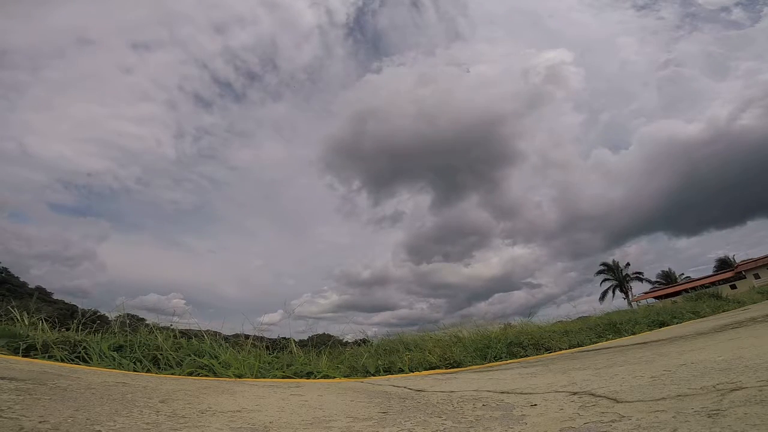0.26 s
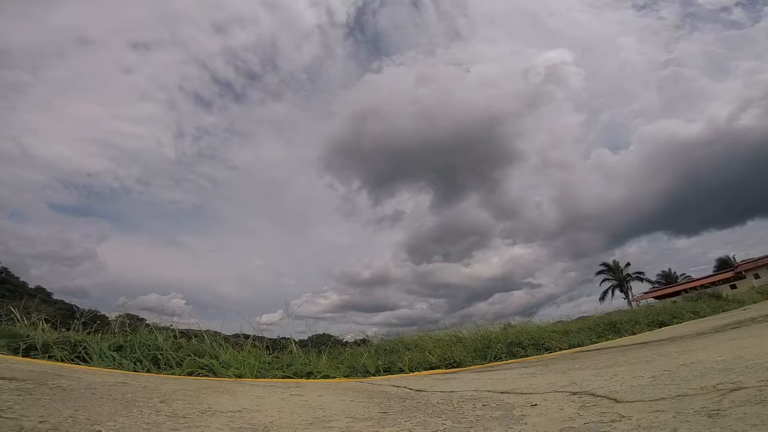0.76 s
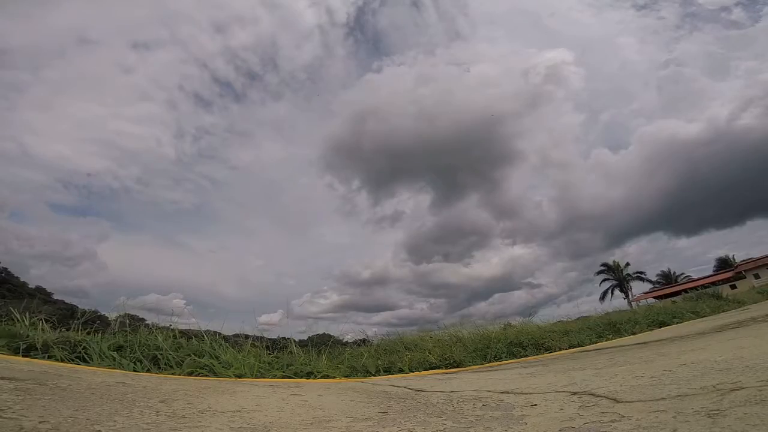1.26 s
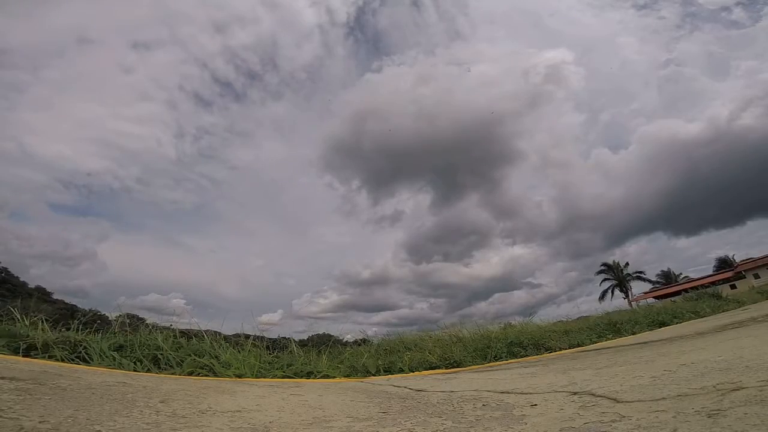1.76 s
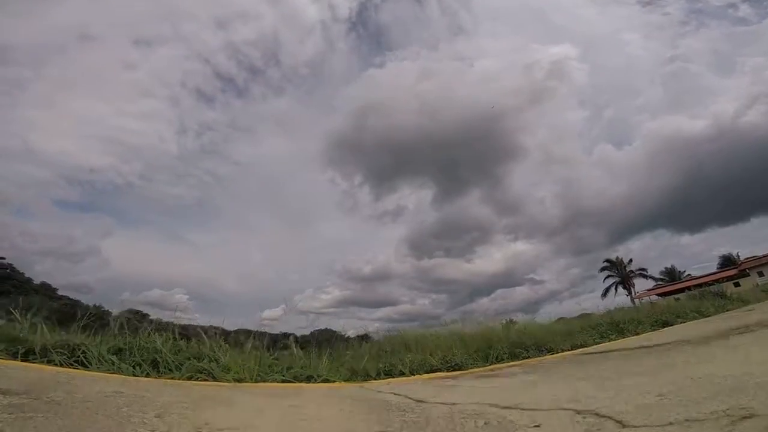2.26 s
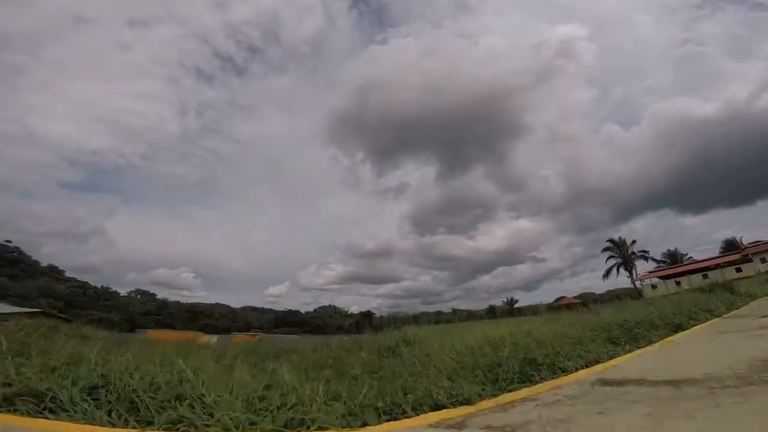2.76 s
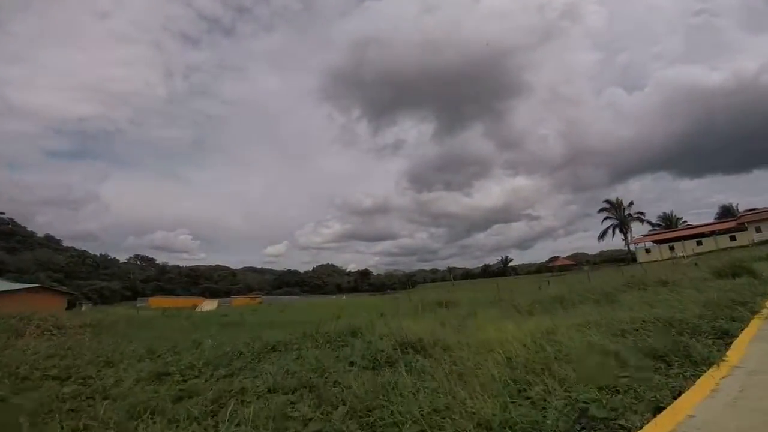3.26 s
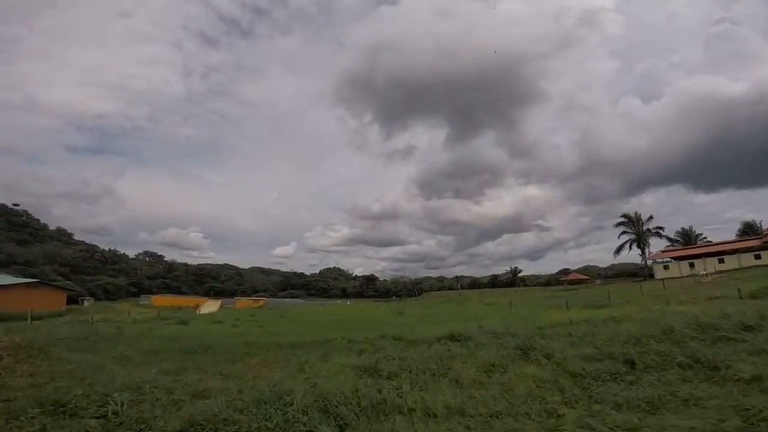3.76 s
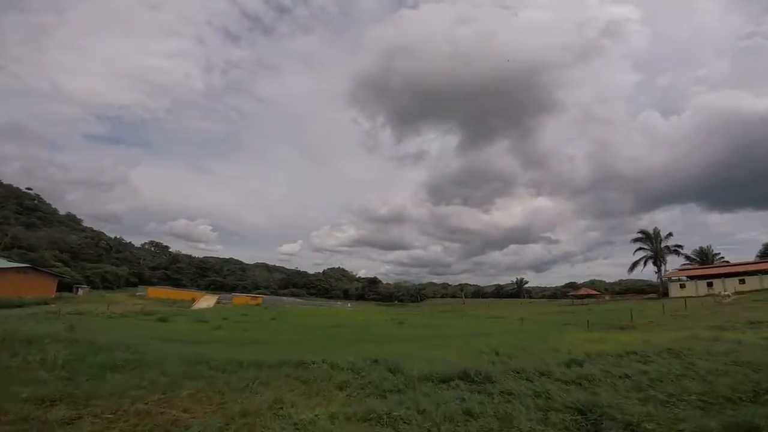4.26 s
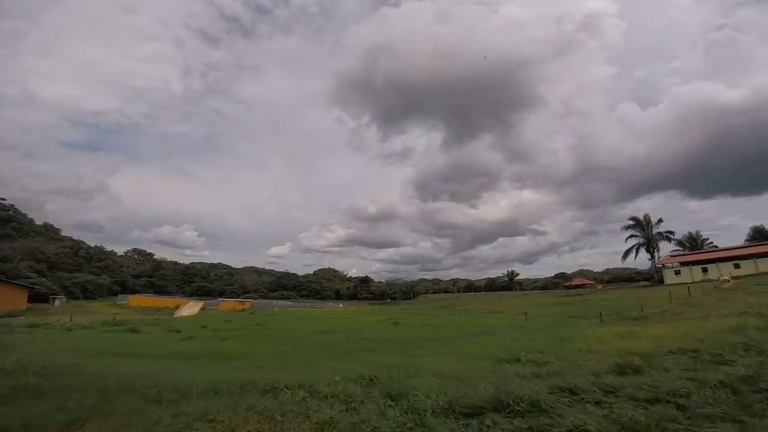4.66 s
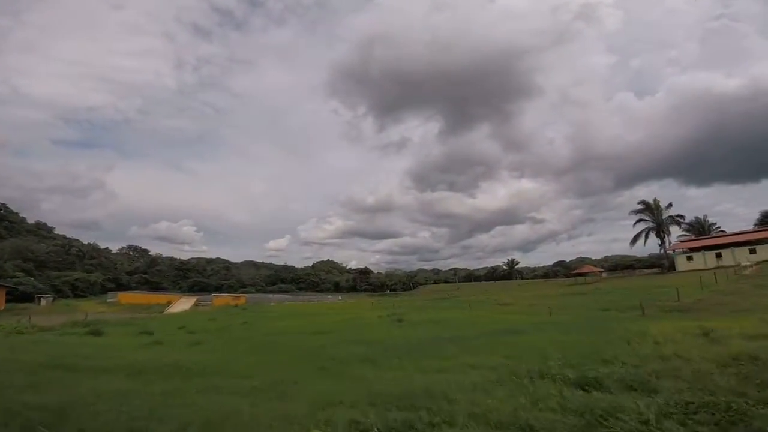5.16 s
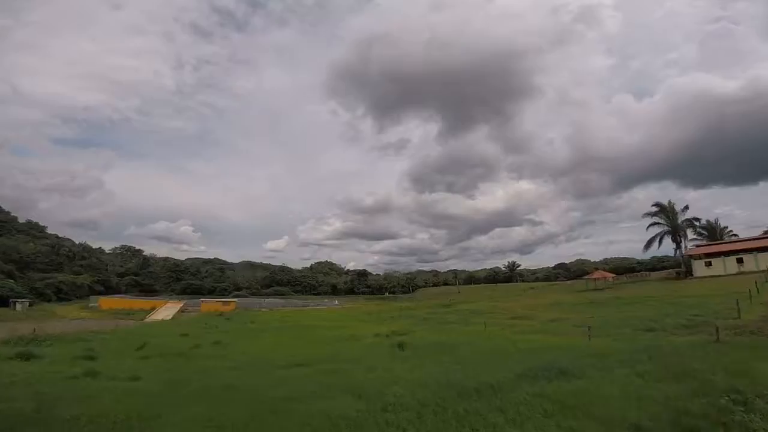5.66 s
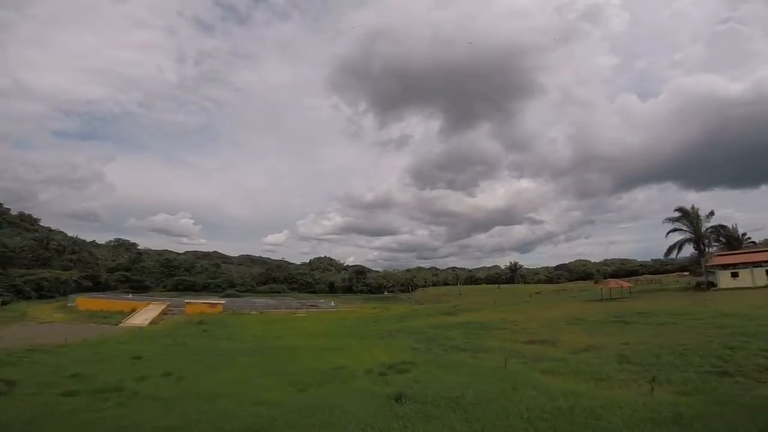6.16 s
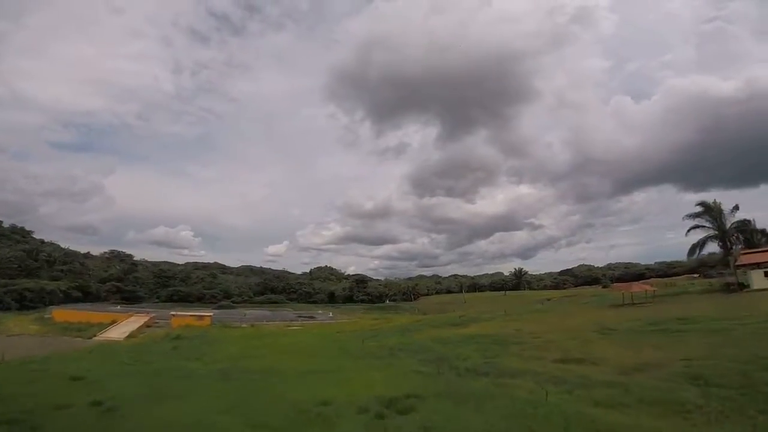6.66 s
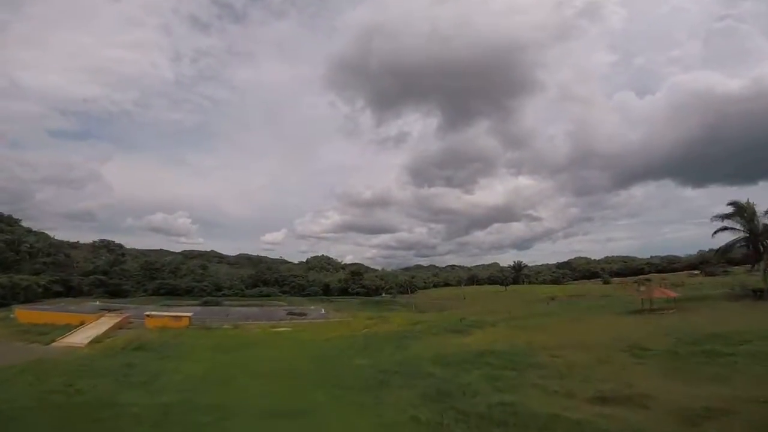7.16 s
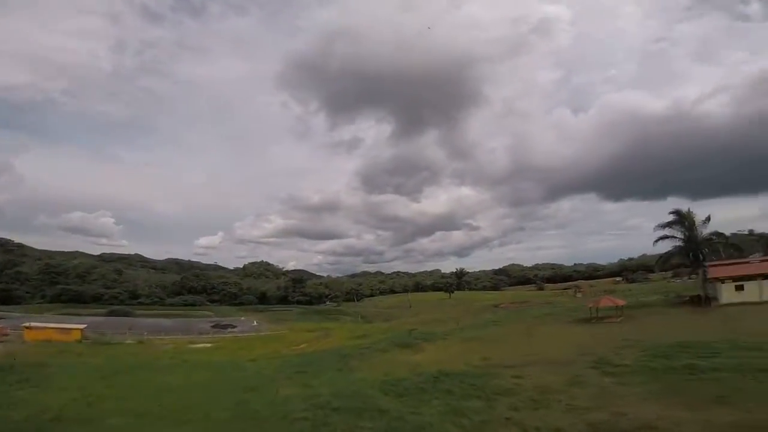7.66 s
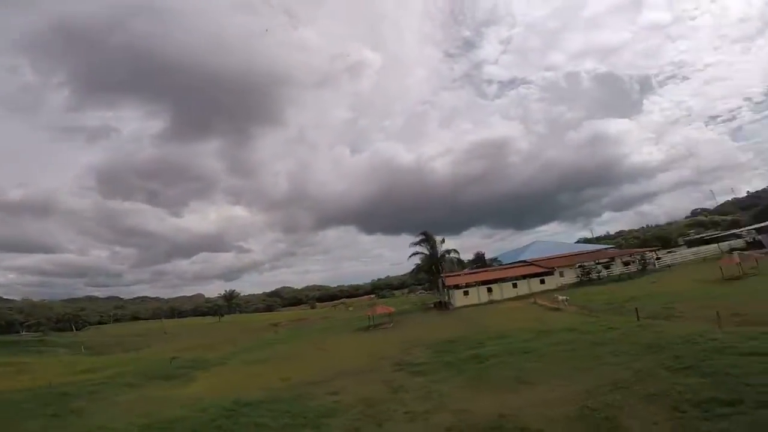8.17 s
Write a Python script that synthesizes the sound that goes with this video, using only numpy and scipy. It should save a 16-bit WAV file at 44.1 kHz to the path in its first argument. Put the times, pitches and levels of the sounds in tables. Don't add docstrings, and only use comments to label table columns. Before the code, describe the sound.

Mounted on a small quadcopter, the microphone hears motors whine and rattle on concrete for a moment, then propellers jump to a loud pulsing hum. The pitch climbs at takeoff into a rough steady buzz over grass. A cut and recovery follow, then screaming punches with limp drops between them, a near-idle flutter, and a last surge. Low wind roar and airy hiss surround everything, close and dry outdoors.

```python
import sys
import numpy as np
from scipy import signal
from scipy.fft import rfft, irfft
from scipy.io import wavfile
from scipy.ndimage import uniform_filter1d

SR = 44100
rng = np.random.default_rng(int(sys.argv[2]) if len(sys.argv) > 2 else 0)


def gain_from_db(level_db):
    decades = np.asarray(level_db, float) / 20
    return 10 ** decades


def dump_mix(stems):
    frames = np.atleast_2d(stems).T
    limited = np.clip(frames, -1, 1)
    pcm = np.round(limited * 32767).astype(np.int16)
    wavfile.write(sys.argv[1], SR, pcm)


N = 371322
TIME = np.arange(N) / SR
BLADES = 3

# (time [s], overtones [dB], frame [dB])
FLIGHT = [(0, 6, 9), (.55, -6.5, 3.5), (1.08, 2, -5), (1.2, 10.5, -3.5), (1.6, 0, 0), (1.95, 2.5, -4.5),
          (2.15, -10, -5.5), (2.4, -7.5, 0), (2.9, -0.5, -1), (3.2, -0.5, -4.5), (3.5, 2, -2),
          (3.85, -1.5, 12.5), (4.5, -7.5, 6), (4.78, -7, 3), (4.9, -1.5, 7.5), (5.45, -6, 6),
          (5.75, -0.5, 6.5), (6.45, -0.5, 1), (6.7, -2, -2), (7.0, -7.5, 6.5), (7.9, 6, 2), (8.1, 1.5, 2.5),
          (8.42, 2.5, 6)]


def curve(table):
    s, *columns = np.transpose(table)
    return [np.interp(TIME, s, c) for c in columns]


def by_speed(table, hz):
    at, *columns = np.transpose(table)
    return [np.interp(np.log(hz), np.log(at), c) for c in columns]


def span(table, fade=0.0068):
    start, end = table[0][0], table[-1][0]
    return np.clip(np.minimum(TIME - start, end - TIME) / fade + (start == 0), 0, 1)


def dips(table):
    return sum(depth_db * np.exp(-((TIME - s) / width) ** 2) for s, depth_db, width in table)


def walk(rate):
    k = int(SR / rate)
    held = np.repeat(rng.standard_normal(N // k + 1), k)
    return 1.3 * uniform_filter1d(uniform_filter1d(held, k), k)[:N]


def noise(shape, lo_hz, hi_hz):
    hz = np.arange(N // 2 + 1) * SR / N + 1
    at, db = np.transpose(shape)
    gain = gain_from_db(np.interp(np.log(hz), np.log(at), db, -90, -90))
    bins = rfft(rng.standard_normal(N)) * gain
    inside = np.sum(np.abs(bins[(hz > lo_hz) & (hz < hi_hz)]) ** 2) * 2 / N ** 2
    return irfft(bins, N) / np.sqrt(inside)


def tone(phase, db, flutter_db):
    return np.sqrt(2) * gain_from_db(db + flutter_db * walk(30)) * np.sin(phase)


def hunt(lead):
    # (start [s], end [s], a moment the cycles peak at, counted on or back [s], rate [Hz], speed swing [0-1])
    bursts = [
        (5.089, 5.24, 5.105, 24.66, 0.08),
        (5.592, 5.792, 6.06, 26.18, 0.04),
        (6.511, 7.021, 6.2, 23.04, 0.13),
    ]
    out = 0
    for start, end, top, rate, swing in bursts:
        progress = np.clip((TIME - start) / (end - start), 0, 1)
        swell = np.sin(np.pi * progress ** 1.53) ** 0.49
        swell = swell * (1 + 0.2 * np.sin(2 * np.pi * 7.3 * TIME))
        out = out + swing * swell * np.cos(2 * np.pi * (rate * (TIME - top) + lead))
    return out


def turn(hz, lead, jitter, share):
    return 2 * np.pi * np.cumsum(hz * (1 + share * hunt(lead) + jitter * walk(40))) / SR


def stir(hz):
    return uniform_filter1d(np.gradient(np.log(hz)) * SR, SR // 40)


def stick():
    # (start [s], length [s], blade rate [Hz], blade tone [dB], effort [dB])
    moves = [(0.313, 0.039, 239.6, -14.5, -41), (0.396, 0.11, 346.4, -9, -43),
             (0.501, 0.14, 321.9, -9, -39.5), (1.087, 0.085, 360.7, -8, -42),
             (1.547, 0.086, 382.5, -10, -41), (1.806, 0.16, 446.8, -15, -34), (2.05, 0.13, 550, -25, -31),
             (2.27, 0.061, 530, -25.5, -34), (2.36, 0.19, 625, -24, -34), (2.55, .19, 642.5, -19.5, -32.5),
             (2.741, 0.027, 619.7, -19.5, -33.5), (2.845, 0.074, 644, -20.5, -32.5),
             (2.95, 0.31, 639.4, -23, -32), (3.282, 0.055, 628.4, -19.5, -33),
             (3.599, .04, 618, -18.5, -34), (3.778, 0.062, 593.6, -17.5, -36.5),
             (3.86, 0.12, 289.3, -23, -44.5), (4.01, 0.05, 344.8, -18, -39.5),
             (4.08, 0.051, 374.4, -14.5, -40.5), (4.136, 0.087, 536, -19, -35),
             (4.421, 0.08, 443, -14, -39), (4.805, 0.29, 800, -25, -36), (5.135, 0.095, 479.9, -19.5, -41),
             (5.37, .27, 938.3, -19, -33.5), (5.73, 0.081, 419.8, -35, -46.5),
             (5.832, .05, 303.3, -45, -55.5), (6.006, .33, 190, -30, -53), (6.37, 0.05, 310, -10, -44),
             (6.425, 0.085, 720.5, -20, -35.5), (6.55, 0.17, 878.7, -20.5, -37),
             (6.941, 0.092, 433, -32, -46.5), (7.035, 0.062, 270.4, -44, -54.5),
             (7.401, 0.21, 97.2, -31, -49), (7.62, 0.058, 98.1, -20, -47.5),
             (7.79, 0.093, 159.9, -16.5, -44), (7.89, 0.047, 205.1, -10.5, -40.5),
             (7.968, 0.17, 502.5, -17.5, -35), (8.2, .1, 514.5, -18, -35),
             (8.325, 0.06, 596.6, -18.5, -33.5)]
    # (blade rate [Hz], blade tone [dB], effort [dB])
    rest = (250, -17, -48.5)
    motor_lag_s, stall_db, stall_slope, spin_up_db = 0.031, -47, 2.53, 0.39
    rise_half, fall_half = 0.57, 0.36
    rows, last = [(0, *rest)], np.array(rest)
    for start, length, *state in moves:
        share = rise_half if state[0] > last[0] else fall_half
        half = last + share * (state - last)
        rows += [(max(start, rows[-1][0]), *last), (start + length / 2, *half), (start + length, *state)]
        last = np.array(state)
    lag = int(motor_lag_s * SR)
    hz, blade_db, effort_db = (uniform_filter1d(c, lag, mode="nearest") for c in curve(rows))
    effort_db = effort_db + spin_up_db * np.clip(stir(hz), 0, 6)
    return hz, blade_db, effort_db + stall_slope * np.minimum(effort_db - stall_db, 0)


def microphone_noise():
    # (frequency [Hz], density [dB per Hz])
    self_noise = [(450, 4.5), (700, 16.5), (1300, 0.5), (3000, -18), (6200, -20.5), (7400, -24),
                  (10500, -14.5), (14500, -30)]
    # (frequency [Hz], width [Hz], level [dB])
    modes = [(1950, 200, -64), (4580, 400, -70), (5550, 400, -70), (6640, 200, -71), (8200, 250, -72),
             (9160, 500, -71)]
    out = noise(self_noise, 1500, 15000) * gain_from_db(-68.0 + 1.5 * walk(16))
    for hz, width, db in modes:
        mode = [(hz - 2 * width, -24), (hz, 0), (hz + 2 * width, -24)]
        out += gain_from_db(db + 3.5 * walk(14)) * noise(mode, 20, SR / 2)
    return out


def ticks():
    # (time [s], level [dB], frequency [Hz])
    taps = [
        (0.347, -38, 5200),
        (6.224, -65, 8240),
        (7.473, -53, 6820),
        (7.68, -49, 4940),
    ]
    decay_s = 0.006
    out = np.zeros(N)
    for s, db, hz in taps:
        age = np.maximum(TIME - s, 0)
        band = signal.butter(2, [0.74 * hz, 1.17 * hz], "bp", fs=SR, output="sos")
        ring = signal.sosfilt(band, rng.standard_normal(N))
        out += gain_from_db(db + 20.0) * (TIME > s) * np.exp(-age / decay_s) * ring
    return out


def idle_whine():
    # (multiple of idle turns, level [dB])
    magnets = [(3.7, -23.5), (6.5, -26.5), (7, -23), (7.2, -32), (8, -28.5), (8.6, -30.5), (9.5, -35.5),
               (21, -42.5), (22.5, -49.5), (24.0, -37.5), (25.3, -43)]
    # (frequency [Hz], density [dB per Hz])
    rattle = [(3000, -12), (4700, -8), (5400, 1), (6500, -9), (8000, -25), (9000, -9), (9500, -18),
              (10000, -10), (11000, -28)]
    # (time [s], whine level [dB])
    idle = [(0, -2.5), (.3, -1), (.36, -39), (5.8, -35), (5.92, -26), (6.33, -25), (6.4, -35), (7.1, -25),
            (7.3, -21), (7.5, -26), (8.42, -34)]
    aloft = TIME > 1
    phase = turn(83.9, 0., jitter=.004 + .012 * aloft, share=0)
    out = sum(tone(k * phase + (.6 + .04 * k * aloft) * walk(50), db, 2.) for k, db in magnets)
    out += (TIME < 1) * noise(rattle, 1500, 15000) * gain_from_db(-52 + 2.5 * walk(30))
    return out * gain_from_db(curve(idle)[0])


def ground_scour():
    # (frequency [Hz], density [dB per Hz])
    scour = [(700, -23), (1200, 4), (2000, 1.5), (2900, 1), (3600, -21), (4500, -29)]
    # (time [s], scour level [dB])
    ground = [(.35, -41), (.6, -33), (1.12, -28), (1.3, -39.5), (1.75, -34.5), (2.15, -26), (2.3, -29.5),
              (2.45, -52)]
    level_db = curve(ground)[0] + 1.8 * walk(18) + 1.3 * walk(90)
    return span(ground) * noise(scour, 800, 4000) * gain_from_db(level_db)


def air(blade):
    # (time [s], gust [dB])
    gusts = [(0, -22), (.3, -18.5), (.35, -16.5), (1.15, -15), (1.3, -19), (1.8, -18.5), (2.16, -14),
             (2.37, -21), (2.5, -25.5), (3.3, -26), (3.96, -27.5), (4.25, -24), (4.9, -28), (5.4, -22.5),
             (6.47, -20.5), (6.6, -18.5), (7.5, -25.5), (8.14, -15)]
    # (blade rate [Hz], roar over gust [dB])
    roar_by_speed = [(250, 5.5), (340, 2.5), (450, 3.5), (620, 3), (900, -0.5)]
    # (start [s], end [s], top [dB], wash [dB])
    puffs = [
        (0.317, 0.511, 17.5, 3.5),
        (0.478, 0.746, 5, -0.5),
        (1.9, 2.34, 4.5, -2.5),
        (3.25, 3.45, -3, 3.5),
        (4.843, 5.038, 15, 5),
        (6.404, 6.536, 14, 6.5),
        (6.69, 6.988, 14, -1),
        (7.865, 8.21, -2, 3),
        (8.198, 8.5, 4, -4),
    ]
    # (frequency [Hz], density [dB per Hz])
    wind_shape = [(12, -6.5), (25, -4.5), (50, 0.5), (90, 1.5), (160, -1.5), (260, -16), (420, -18),
                  (520, -43)]
    roar_shape = [(330, -13), (440, -4), (660, -9.5), (760, -13.5), (1000, -16.5), (1400, -20), (2000, -37),
                  (3500, -71)]
    drum_shape = [(130, -22), (220, 0.5), (300, -4), (400, -7.5), (470, -26.5)]
    wash_shape = [(300, -31), (700, 3), (1300, 1.5), (2200, 0.5), (3300, -3), (4500, -10), (6000, -25.5),
                  (9000, -34)]
    hiss_shape = [(2500, -31), (4200, -1.5), (4800, -2.5), (5900, -0.5), (7100, 4), (7800, 0), (8400, -6),
                  (8800, -4.5), (9500, -14), (10300, -21), (11000, -14), (12000, -28), (13000, -23),
                  (14800, -51.5)]
    top_shape = [(8500, -7), (10000, -1.5), (12000, -8), (13300, -10.5), (14000, -33)]
    (hz, _, hiss_db), gust_db = stick(), curve(gusts)[0]
    wind_db = gust_db + 0.25 * np.minimum(hiss_db + 43.5, 0)
    roar_db = wind_db + curve(FLIGHT)[1] + by_speed(roar_by_speed, hz)[0]
    roar_db = roar_db + 0.21 * np.minimum(hiss_db + 38, 0)

    wake_s, wake_offset_db = 0.05, -11
    keep = np.exp(-1 / (wake_s * SR))
    wake_db = 20 * np.log10(signal.lfilter([1 - keep], [1, -keep], gain_from_db(hiss_db))) + wake_offset_db
    wash_db = 11.5 + 0.72 * np.maximum(hiss_db, wake_db) + 0.82 * gust_db - 0.3 * np.log2(hz / 500)

    push_db, flicker_db = 25 * hunt(0.022), 1.1 * walk(25)
    puff_db, gush_db = sum(np.outer(db, span([(start,), (end,)], fade=0.021)) for start, end, *db in puffs)
    wash_db, hiss_db = wash_db + gush_db, hiss_db + 0.23 * puff_db

    wind = noise(wind_shape, 5, 129) * gain_from_db(wind_db + 0.39 * walk(7.8))
    roar = noise(roar_shape, 220, 1700) * gain_from_db(roar_db - 13.5 + flicker_db)
    drum_db = roar_db - 3.0 - 1.12 * np.clip(hiss_db + 52, 0, 14) + 3.3 * walk(20)
    roar += noise(drum_shape, 215, 450) * gain_from_db(drum_db)
    wash = noise(wash_shape, 1820, 6400) * gain_from_db(wash_db - 4.5 + push_db + flicker_db + 1.34 * walk(120))
    wash = wash * (1 + 0.28 * np.cos(blade))
    hiss = noise(hiss_shape, 5100, 11000) * gain_from_db(hiss_db - 3.5 + push_db + flicker_db + 0.69 * walk(120))
    hiss = hiss * (1 + 0.17 * np.cos(blade))
    top_db = hiss_db + 0.5 * gust_db - 22.5 + puff_db + push_db + 1.5 * walk(120)
    top = noise(top_shape, 9000, 15000) * gain_from_db(top_db)
    return wind + roar + wash + hiss + top


def shafts():
    # (time [s], speed ratio to the nearest shaft, shake [dB])
    worst = [(0, 1.46, -6), (.3, 1.55, -7.5), (.35, 1.5, -24), (.5, 0.86, -36.5), (1.6, 0.96, -16),
             (2.07, 0.93, -21.5), (2.13, .96, -9.5), (2.3, .95, -10.5), (2.5, 0.84, -11.5),
             (3.2, 0.86, -11), (3.7, 0.94, -10.5), (3.87, 0.84, -12.5), (4.0, 1.47, -13.5),
             (4.2, 1.01, -11.5), (4.8, 1.2, -12.5), (5.1, 1.07, -5.5), (5.38, 1.06, -12.5),
             (5.74, 1.043, -11), (6.54, 1.105, -9), (6.8, 0.92, -12), (6.97, 1.05, -10.5),
             (7.9, 1.036, -19.5), (8.15, 1.1, -15), (8.42, 1.05, -15)]
    # (time [s], depth [dB], half width [s])
    chops = [(5.8, 6, .012), (3.4, 11, 0.009), (5.78, 22, 0.035), (0.15, 11, 0.033), (6.39, 26, 0.026),
             (6.1, 16, 0.017), (4.015, 14, 0.037), (5.26, 14, 0.073), (7.04, 27, 0.037), (6.48, 8, .015),
             (4.88, 12, .01), (4.98, 10.5, 0.0081)]
    # (time [s], level over the shake [dB])
    twice = [(0, -19.5), (2.3, -25.5), (2.7, -29), (3.7, -23.5), (4.1, -37), (4.6, -31), (4.95, -14.5),
             (5.08, -28), (5.45, -18.5), (5.7, -21), (6.5, -26.5), (8.0, -27), (8.2, -30), (8.42, -32)]
    # (time [s], frequency [Hz], level [dB])
    wobble = [(2.45, 387, -36), (2.75, 387, -32), (3.05, 385, -28.5), (3.3, 369, -28.5),
              (3.6, 382.4, -32.5), (3.8, 400, -39)]
    # (time [s], turns [Hz], shake [dB])
    beats = [
        [(2.3, 167.1, -10), (2.54, 193.2, -19.5), (2.85, 194.3, -14.5)],
        [(3.6, 181.6, -20), (3.85, 200.6, -11.5), (3.93, 184.2, -13), (3.985, 160, -13)],
        [(4.15, 191, -12), (4.238, 213.5, -14.5), (4.45, 206, -13)],
        [(5.29, 172.4, -12.5), (5.38, 173, -12.5), (5.652, 306.5, -15.5), (5.72, 311.4, -14.5)],
        [(8.15, 171.9, -16.5), (8.234, 180.4, -12), (8.42, 186.3, -14)],
    ]
    # (time [s], turns [Hz], shake [dB])
    near_shaft = [
        [(2.45, 194.7, -12), (2.75, 209.9, -15), (3.85, 210.5, -15)],
        [(4.46, 151.9, -20), (4.8, 152, -18.5), (4.9, 188, -8)],
        [(5.735, 290, -3.5), (5.79, 253, -13)],
        [(6.55, 285, -9.5), (6.686, 307.5, -11), (7.0, 282.4, -11.5)],
    ]
    (near_hz, _, effort_db), (ratio, db) = stick(), curve(worst)
    hz = np.maximum(ratio * near_hz / BLADES, 104.9)
    db = db + 0.66 * np.minimum(effort_db + 40.5, 0)
    db = db - dips(chops)
    twice_db = db + curve(twice)[0]
    phase = turn(hz, 0.28, jitter=0.0055, share=0.58)
    out = tone(phase + 0.52 * np.maximum(-stir(hz), 0) * walk(60), db, 3.4)
    out += tone(2 * phase + 0.88 * walk(60), twice_db, 4.2)
    out += tone(4 * phase + 1.1 * walk(60), twice_db - 15.5, 4.6)

    hz, db = curve(wobble)
    out += span(wobble) * tone(turn(hz, 0., jitter=.01, share=0) + 0.77 * walk(60), db, 2.8)

    for table in beats + near_shaft:
        hz, db = curve(table)
        phase = turn(hz, 0.085, jitter=0.0054, share=1.0)
        shake = tone(phase, db, 1.0)
        if table in beats:
            shake += tone(42 * phase, db - 48 - np.maximum(42 * hz - 9300, 0) * .008, 4.)
        out += span(table) * shake
    return out


def other_props():
    # (time [s], speed ratio, blade tone [dB])
    trim = [(0, 0.96, -21), (.25, 1.32, -20.5), (.45, 0.85, -7), (.6, 0.87, -22.5), (.7, 0.93, -39),
            (1.62, 1.1, -28), (1.72, 0.96, -17.5), (1.92, .92, -20.5), (2.05, 0.87, -21.5),
            (2.45, 0.9, -33), (3.18, .88, -30.5), (3.28, .9, -23.5), (3.6, 0.89, -22.5), (3.84, 0.82, -19),
            (3.91, .92, -16.5), (4.0, 1.12, -24), (4.08, 1.15, -16.5), (4.25, 1.03, -19), (4.6, 1.14, -22),
            (4.95, 1.05, -24), (5.1, .92, -28), (5.35, 1.015, -20), (5.5, 1.09, -28), (5.7, 1.06, -26),
            (5.85, 1.02, -28.5), (6.45, 1.085, -16), (6.55, 0.88, -28.5), (6.8, 0.91, -22.5),
            (7.05, 0.87, -32)]
    # (time [s], blade rate [Hz], blade tone [dB])
    others = [
        [(7.25, 250, -36), (7.35, 246.5, -31), (7.5, 253.2, -37)],
        [(7.55, 205, -23), (7.585, 250, -13), (7.7, 302, -25.5)],
        [(7.7, 235.4, -25), (7.8, 219.4, -11), (7.87, 228, -13.5)],
        [(7.71, 172, -19), (7.79, 188, -16)],
        [(7.93, 354.3, -19.5), (8.05, 354, -11.5), (8.14, 391, -16)],
        [(8.29, 515.7, -17.5), (8.37, 494, -21)],
        [(8.1, 540, -31), (8.17, 672, -28.5), (8.3, 705, -25), (8.42, 795, -25)],
    ]
    # (time [s], level [dB])
    bite = [(0, -3), (3.15, 1), (3.3, 10), (3.6, 3.5), (3.75, 3), (4.9, 3), (5.5, 4.5), (6.5, 2.5),
            (8.05, 2), (8.17, 8), (8.3, 3), (8.42, 1)]
    (near_hz, _, effort_db), (ratio, trim_db) = stick(), curve(trim)
    opposite = ratio * near_hz, trim_db + 1.0 * np.minimum(effort_db + 55.0, 0)
    bite_db = curve(bite)[0] + 0.82 * curve(FLIGHT)[0] - 18.5
    out = 0
    for table in [trim] + others:
        hz, db = opposite if table is trim else curve(table)
        phase = turn(hz, 0.2, jitter=0.005, share=0.72)
        change = np.abs(stir(hz))
        blades = tone(phase + (0.5 + 0.24 * change) * walk(90), db, 1.0)
        for k in range(2, 8):
            partial_db = db + bite_db - 8 * np.log2(k / 2) + 9 * np.log2(hz / 550)
            blades += tone(k * (phase + (.15 + 0.038 * change) * walk(90)), partial_db, 2.2)
        out = out + span(table) * blades
    return out


def cogging(phase):
    # (multiple of shaft turns, level [dB])
    orders = [(5, 0), (6, -3), (7, 0)]
    # (time [s], level [dB])
    level = [(.42, -32), (.52, -33), (.62, -36), (.9, -40.5), (1.1, -38)]
    level_db = curve(level)[0]
    return span(level) * sum(tone(k * phase / BLADES + .4 * walk(60), db + level_db, 2.) for k, db in orders)


def commutation(phase, hz, effort_db):
    out = 0
    for k, db in ((14, -21), (28, -30)):
        whine_hz = k * hz
        whine_db = effort_db + db - np.abs(stir(hz))
        whine_db = whine_db - np.maximum(whine_hz - 9500, 0) * .006 - np.maximum(7000 - whine_hz, 0) * .004
        out = out + (whine_hz < 14000) * tone(k * phase, whine_db, 4.)
    return out


def near_prop():
    # (blade rate [Hz], octave [dB], third partial [dB], fourth partial [dB])
    overtones = [(250, -24.5, -33.5, -35.5), (366, -35.5, -29.5, -42.5), (444, -37.5, -38.5, -38.5),
                 (533, -26.5, -36, -35), (625, -26.5, -36, -38), (780, -35.5, -37.5, -36.5),
                 (970, -27.5, -30, -26)]
    # (time [s], depth [dB], half width [s])
    cancellations = [(0.607, 24, 0.011), (0.695, 10, 0.0093), (0.78, 9.5, 0.016), (0.877, 16, 0.016),
                     (0.965, 26, 0.013), (1.061, 12, 0.015), (1.435, 6, .015), (1.52, 8, 0.0098),
                     (1.67, 7, .01), (1.77, 21, 0.016), (1.815, 10, 0.0079), (1.915, 11, .01),
                     (2.015, 15, .012)]
    # (time [s], phase [rad])
    rough = [(0, .15), (1.1, .3), (1.8, .1), (2.3, .15), (4.8, .15), (4.9, .2), (5.2, .22), (5.4, .17),
             (5.7, .2), (6.4, .12), (8.1, .12), (8.25, .22), (8.42, .25)]
    # (time [s], slope [dB per octave])
    tilt = [(0, -2), (1.9, -12.5), (2.3, 0.5), (3.8, -6), (4.8, -7), (5.1, -12), (5.5, -3), (6.5, -11),
            (7.0, -7), (8.1, -3), (8.42, -11)]
    cruise_db, flutter_db = -34, 2.2
    hz, blade_db, effort_db = stick()
    bite_db = curve(FLIGHT)[0] + 1 * (effort_db - cruise_db)
    octave_db, third_db, upper_db = (db + bite_db for db in by_speed(overtones, hz))
    tilt_db = curve(tilt)[0]
    phase = turn(hz, 0., jitter=.0045, share=1)
    push_db = 45 * hunt(0.)

    change, surge = stir(hz), np.hypot(hunt(0.), hunt(.25))
    stirred = np.where(change > 0, .004, .03) * np.clip(np.abs(change) - 1.5, 0, 6) ** 2
    smear = curve(rough)[0] + stirred + .4 * surge
    brake_db = 1.5 * np.clip(change + 2, -8, 0)

    frame_hz, frame_width, frame_db = 372, 0.22, -0.5
    resonance = np.exp(-(np.log(hz / frame_hz) / frame_width) ** 2)
    sweep = np.clip(np.maximum(change, -.3 * change) / 5, 0, 1)
    blade_db = blade_db + frame_db * resonance * sweep * (TIME > 2) - dips(cancellations)
    out = tone(phase + (2.0 * smear + 5 * surge) * walk(90), blade_db + push_db + 0.77 * brake_db, 0.33)

    twin_ratio, twin_db = .975, -3
    twin = turn(hz * (twin_ratio + .008 * walk(3)), .1, jitter=.0045, share=1)
    for k in range(2, 13):
        db = {2: octave_db, 3: third_db}.get(k, upper_db + tilt_db * np.log2(k / 4))
        db = db + push_db + brake_db - 8 * (k * hz / 4000) ** 2
        out += tone(k * phase + k * smear * walk(90), db, flutter_db)
        if k > 2:
            out += (TIME > 2) * tone(k * twin + k * smear * walk(90), db + twin_db, flutter_db)
    return out + cogging(phase) + commutation(phase, hz, effort_db), phase


def scene():
    near, blade = near_prop()
    background = microphone_noise() + ticks() + idle_whine() + ground_scour() + air(blade)
    return (background + shafts() + other_props() + near)[None]


def band_limit(x):
    return signal.sosfilt(signal.butter(12, 14700, fs=SR, output="sos"), x)


def record(dry):
    quick, slow = (uniform_filter1d(dry ** 2, int(s * SR)) + 1e-5 for s in (.02, .15))
    held = dry * (slow / quick) ** 0.12
    ceiling = .97
    drive = held / ceiling
    rounded = ceiling * np.tanh(drive + drive ** 3 / 3)
    return band_limit(rounded)


dry = scene()
out = record(dry)
dump_mix(out)
```